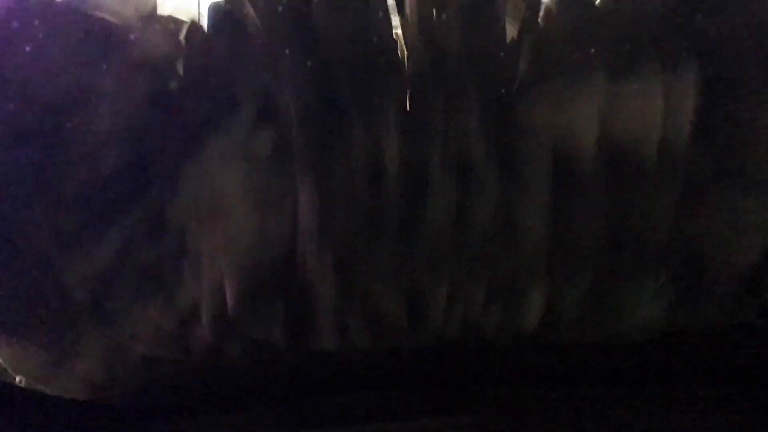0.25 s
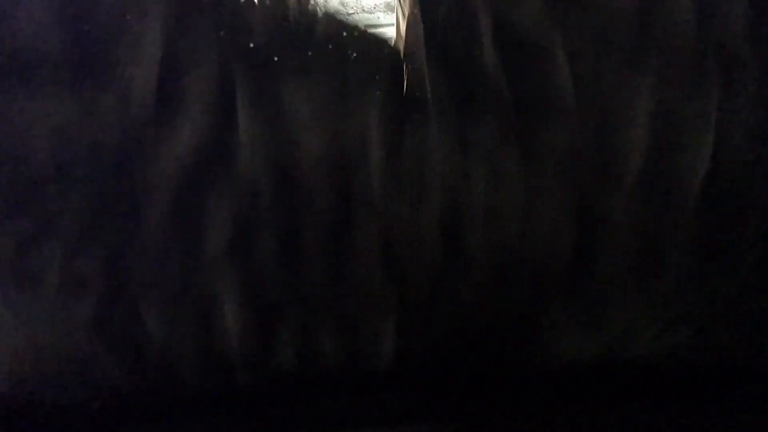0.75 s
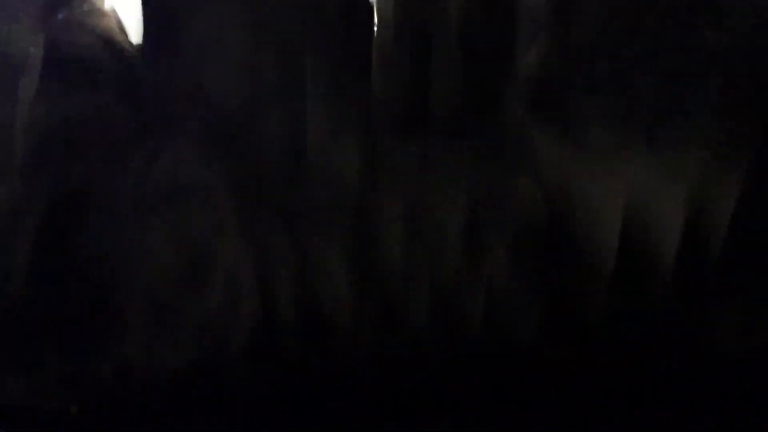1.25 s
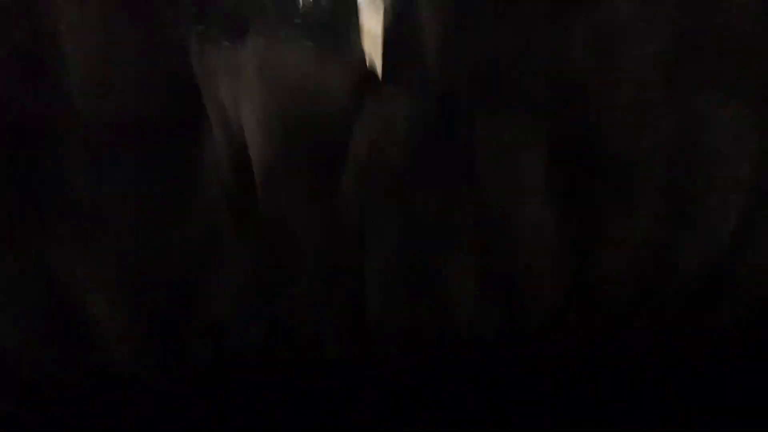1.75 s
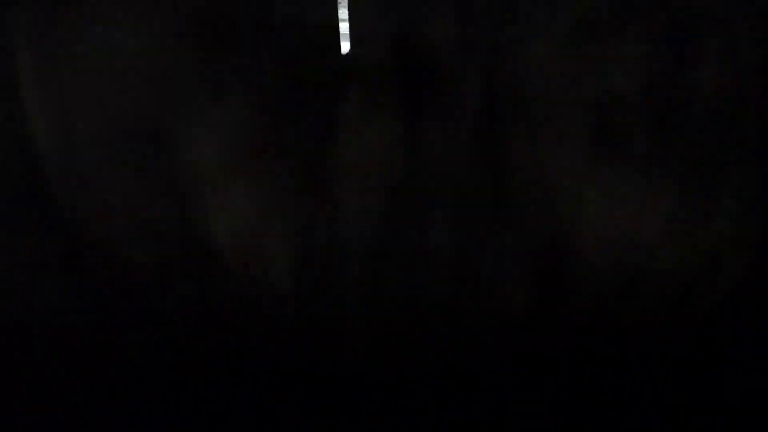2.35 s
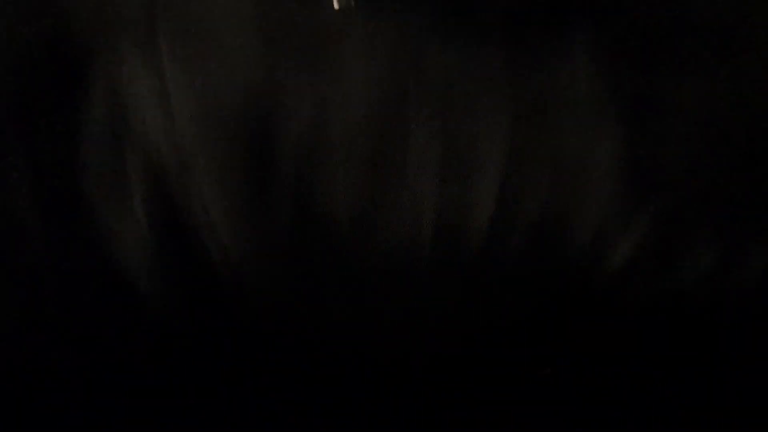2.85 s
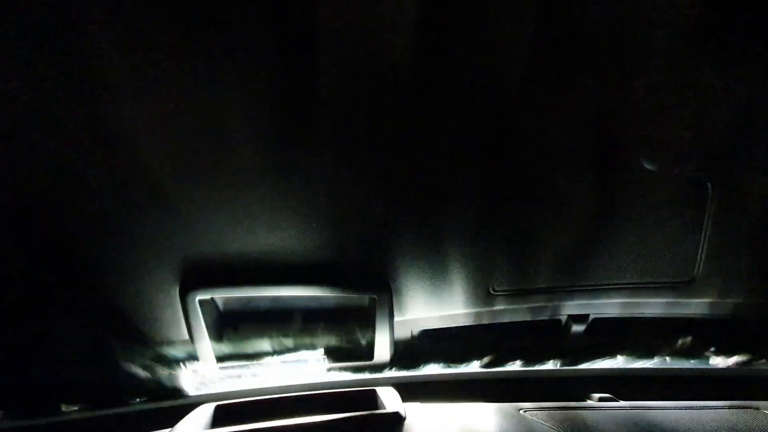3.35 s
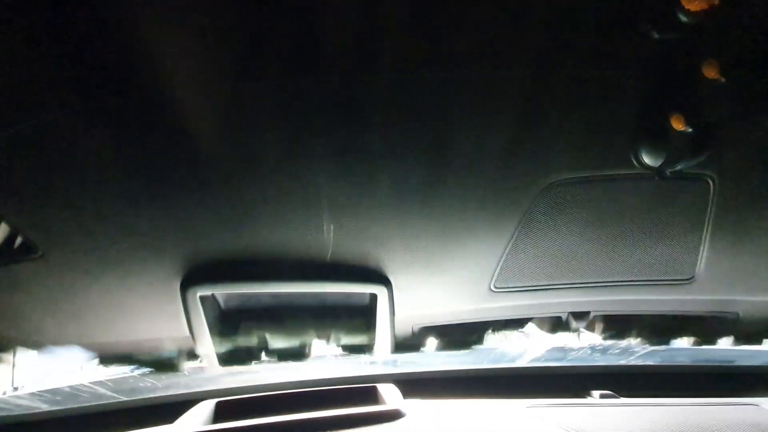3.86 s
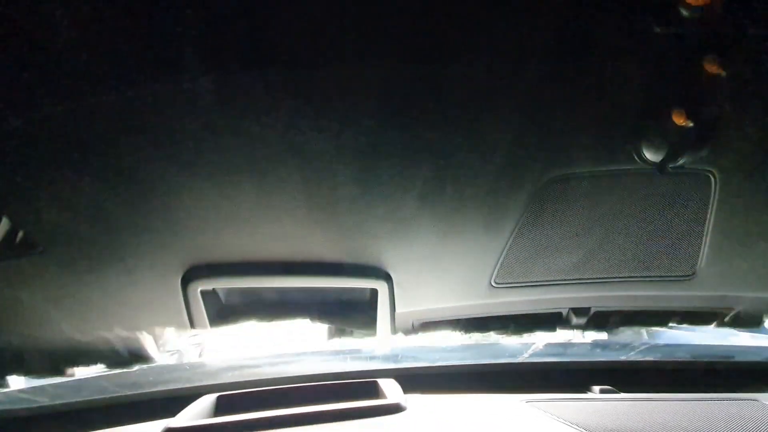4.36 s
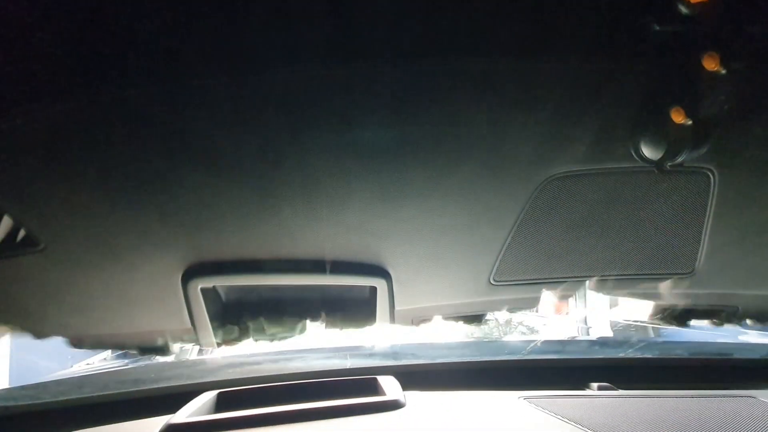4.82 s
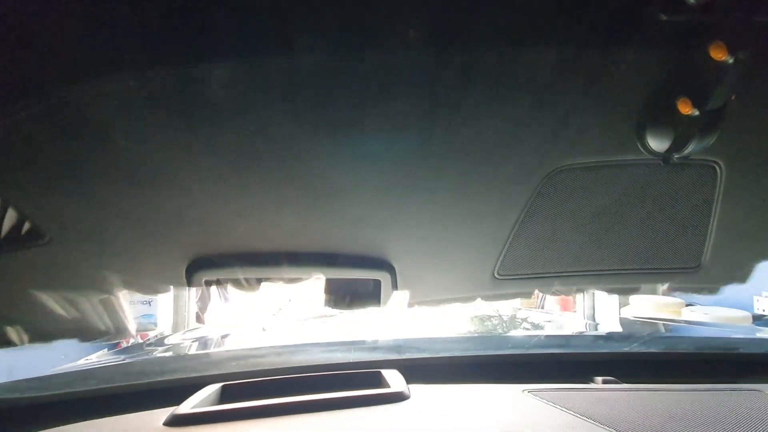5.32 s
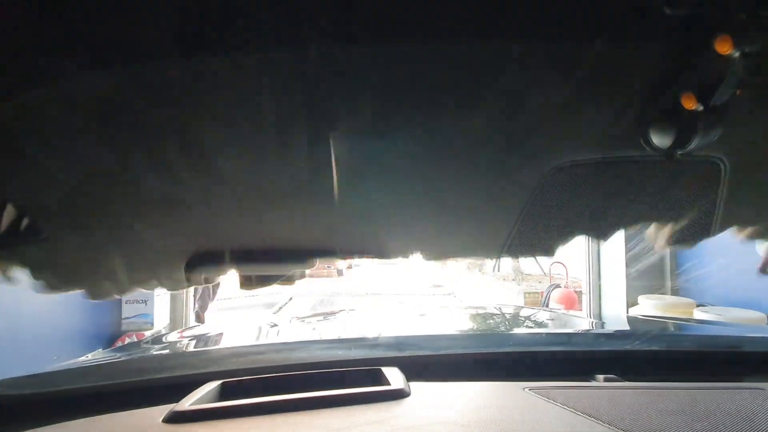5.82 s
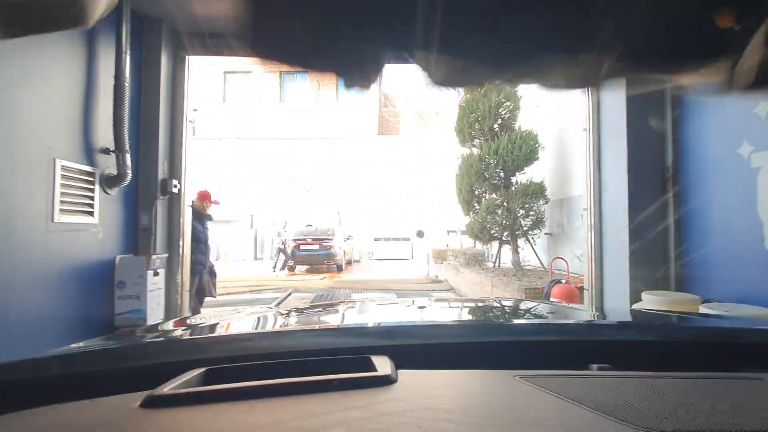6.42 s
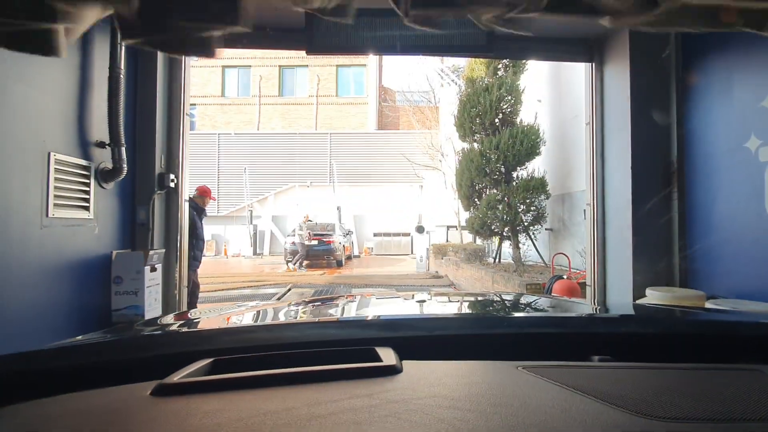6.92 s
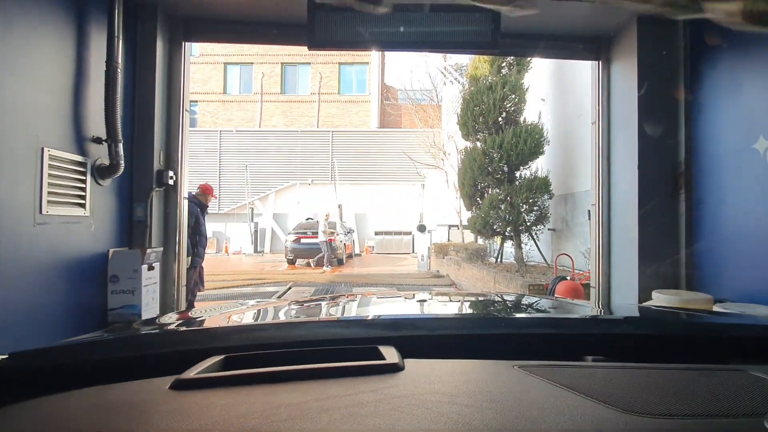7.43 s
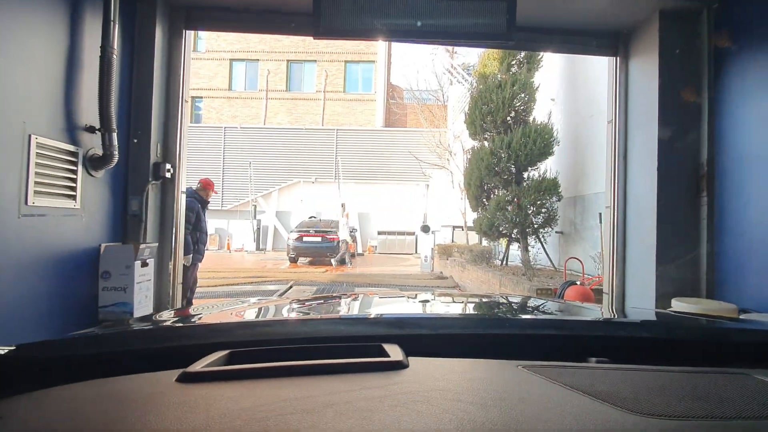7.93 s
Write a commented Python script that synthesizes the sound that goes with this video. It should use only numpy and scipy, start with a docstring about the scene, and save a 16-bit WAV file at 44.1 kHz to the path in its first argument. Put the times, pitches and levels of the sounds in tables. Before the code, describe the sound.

Inside a closed car in a wash bay, stereo microphones on the dashboard catch a dense, low, buffeting dryer roar. It starts with a brief louder surge, then slowly eases as the blower moves away over the roof, leaving a steady boomy rumble. Weak fan tones and a thin high whine waver within it; near the end come faint close rustles, a tiny creak and small dry ticks.

```python
"""A buffeting roar comes first: a dryer's air jet on a closed car in a wash bay, heard by stereo microphones
on the dashboard. Jet and bay are coloured noise (turbulence) filtered by cabin resonances; the jet fades as
the gantry moves away over the roof while the bay keeps roaring. Noise bands swell and fade within the roar,
some sliding in pitch; narrow noise bands and a wavering sine are fan and motor tones. Close by, mostly late
on, grainy noise and slip pulses rustle, and damped modes with noise bursts tick."""
import sys
import numpy as np
from scipy import signal
from scipy.fft import rfft, irfft, next_fast_len
from scipy.io import wavfile
from scipy.ndimage import uniform_filter1d

SR = 44100
rng = np.random.default_rng(int(sys.argv[2]) if len(sys.argv) > 2 else 0)


def master(y):
    """Save y as 16-bit WAV."""
    cut = np.clip(np.atleast_2d(y).T, -1, 1)
    pcm = np.round(cut * 32767)  # scale
    wavfile.write(sys.argv[1], SR, pcm.astype(np.int16))


N = 360738  # length in samples
FFT_N = next_fast_len(N)


def undb(db):
    """Level to amplitude: 20 dB is a factor of ten."""
    return 10 ** (np.asarray(db) / 20)


def seconds():
    """Sampling principle: sample n lies at n / SR seconds."""
    return np.arange(N) / SR


def bins():
    """Discrete Fourier analysis: spectrum lines one bin apart, counted from the first bin above zero."""
    return np.arange(1, FFT_N // 2 + 2) * SR / FFT_N


def colour(points):
    """Spectral envelope: dB at each line, interpolated over log frequency."""
    hz, db = np.transpose(points)
    return np.interp(np.log(bins()), np.log(np.maximum(hz, 1)), db)


def shaped(x, db):
    """Linear filtering: multiply the spectrum of x by a gain in dB at each line."""
    spectrum = rfft(x, FFT_N) * undb(db)
    return irfft(spectrum, FFT_N)[..., :N]


def noise(db):
    """Coloured random noise: filtered white noise, brought to rms 1."""
    x = shaped(rng.standard_normal(N), db)
    return x / np.std(x)


def walk(rate):
    """Slow random modulation: levels held 1 / rate s and smoothed twice; spread near 1."""
    k = int(SR / rate)
    steps = np.repeat(rng.standard_normal(N // k + 1), k)
    smooth = uniform_filter1d(uniform_filter1d(steps, k), k)
    return 1.3 * smooth[:N]


def peak(hz, width):
    """Resonance: Lorentzian power response, 1 at its centre."""
    return 1 / (1 + (2 * (bins() - hz) / width) ** 2)


def sides(x, pan_db):
    """Interchannel level difference: left is pan_db above right."""
    return x * undb(np.array([[pan_db], [-pan_db]]) / 2)


def bell(middle, half):
    """Gaussian envelope: 1 at the middle, 1/e at half s to either side."""
    return np.exp(-((seconds() - middle) / half) ** 2)


def stroke(start, hold, edge):
    """Held envelope: 1 while held, with Gaussian edges before and after."""
    t = seconds()
    outside = np.maximum(np.maximum(start - t, t - start - hold), 0)
    return np.exp(-(outside / edge) ** 2)


WAVER_WIDTHS, WAVER_PER_S = .28, 6  # centre wanders by a share of the width
FLICKER_DB, FLICKER_PER_S = 2.2, 9


def band(hz, width, glide=0, middle=0):
    """Narrow-band noise: its analytic signal is shifted in frequency, its level flickers; rms near 1."""
    shift_hz = glide * (seconds() - middle) + WAVER_WIDTHS * width * walk(WAVER_PER_S)
    ring = signal.hilbert(noise(20 * np.log10(peak(hz, width))), FFT_N)[:N]
    shifted = (ring * np.exp(2j * np.pi * np.cumsum(shift_hz) / SR)).real
    return shifted * undb(FLICKER_DB * walk(FLICKER_PER_S))


# cabin resonances, negative lifts being dips:
# f/Hz, width/Hz, lift of the shared part/dB, lift of the opposite part/dB
CABIN_MODES = [(58.4, 26, 4.5, 3.5), (121.3, 20, 7.5, 1.5), (176, 39, 2, -1), (317, 62, 4.5, 1.5),
               (413, 34, 1.5, 0), (525, 51, -0.5, 2.5), (753, 100, 5, 0.5), (800, 45, 0.5, 5),
               (1007, 52, 5, 2), (1340, 360, 3.5, 1.5), (1400, 60, -2, 3.5), (1790, 52, 3.5, 0.5),
               (1920, 61, 4, 2.5), (2483, 220, 4.5, 6), (91, 13, -1, -0.5), (144, 14, -1, 0),
               (262.5, 20, -3.5, -2), (289.5, 20, 3, -0.5), (640, 43, -1, 0.5), (2790, 140, 2, 0.5),
               (1750, 54, -3, 1), (2180, 130, -2, -4), (2560, 81, 0.5, -5), (4260, 1500, 3, 1.5),
               (7040, 1800, 4.5, -5.5)]


def cabin():
    """Room modes: even and odd modes lift or lower the spectrum around each resonance."""
    return sum(np.array([[even], [odd]]) * peak(hz, width) for hz, width, even, odd in CABIN_MODES)


def roar(mid, side, side_db, gust_db, modes):
    """Turbulence in an enclosure: even modes reach both microphones alike, odd ones with opposite sign."""
    alike = noise(colour(mid) + modes[0]) * undb(gust_db * walk(9))
    opposite = noise(colour(side) + modes[1]) * undb(side_db + gust_db * walk(8.8))
    return np.array([alike + opposite, alike - opposite])


# noise spectrum of the jet, shared by both microphones: f/Hz, relative density/dB
JET_SHARED = [(40, -17), (90, -8), (200, -1.5), (270, -10), (500, -17), (650, -24), (1100, -34),
              (2200, -40), (3200, -47), (5000, -58.5), (7500, -70.5), (8500, -74.5), (16000, -94)]
# noise spectrum of the jet, opposite in sign at the two microphones: f/Hz, relative density/dB
JET_OPPOSITE = [(40, -23), (100, -9.5), (200, -8), (270, 0), (500, -8.5), (1000, -15.5), (2000, -25.5),
                (3200, -36.5), (5000, -46.5), (7500, -51), (8500, -65), (16000, -74.5)]
JET_DB, JET_FAR_DB, JET_OPPOSITE_DB = -16.5, -23.5, -8  # overhead; far; opposite part re shared part
JET_LEAVES_S, JET_FADE_DB_PER_S = 1.34, 1.5
JET_GUST_DB = 0.73


def jet(modes):
    """Jet noise and distance: gusting turbulence, steady overhead, then fading until it is far."""
    fade_db = JET_FADE_DB_PER_S * (seconds() - JET_LEAVES_S)
    jet_db = np.clip(JET_DB - fade_db, JET_FAR_DB, JET_DB)
    return undb(jet_db) * roar(JET_SHARED, JET_OPPOSITE, JET_OPPOSITE_DB, JET_GUST_DB, modes)


# noise spectrum of the bay, shared by both microphones: f/Hz, relative density/dB
BAY_SHARED = [(15, -27), (25, -5.5), (45, 2.5), (90, -4.5), (200, -12.5), (270, -17), (500, -32),
              (650, -36), (1100, -40.5), (2200, -42.5), (3200, -60.5), (5000, -61.5), (7500, -68.5),
              (8500, -79.5)]
# noise spectrum of the bay, opposite in sign at the two microphones: f/Hz, relative density/dB
BAY_OPPOSITE = [(15, -29), (30, -8.5), (60, -1.5), (100, -10), (200, -2.5), (270, -3), (500, -10),
                (1000, -21), (2000, -24), (3200, -36.5), (5000, -45.5), (7500, -43), (8500, -62)]
BAY_DB, BAY_OPPOSITE_DB, BAY_GUST_DB = -21.5, -12.5, 0.19
BAY_EARLY_DB, BAY_SETTLE_S = 7.5, 0.16  # louder at first, by this much


def bay(modes):
    """Background turbulence: a nearly steady roar whose level settles exponentially."""
    bay_db = BAY_DB + BAY_EARLY_DB * np.exp(-seconds() / BAY_SETTLE_S)
    return undb(bay_db) * roar(BAY_SHARED, BAY_OPPOSITE, BAY_OPPOSITE_DB, BAY_GUST_DB, modes)


# stereo balance of the roar: f/Hz, left minus right/dB
ROAR_LEAN = [(60, -0.5), (220, 0.5), (320, -5), (530, 2), (820, 0.6), (1260, -0.1), (1950, -4), (2500, 0.5),
             (3200, -0.7), (4500, -4.5), (7000, -4), (8500, -2)]


def lean(air):
    """Frequency-dependent level difference: half the lean is added left and taken away right."""
    return shaped(air, colour(ROAR_LEAN) * np.array([[.5], [-.5]]))


# noise bands that swell and fade within the roar, some sliding in pitch:
# f/Hz, width/Hz, glide/(Hz/s), middle t/s, half length/s, level before flicker/dB, left minus right/dB
SWELLING_BANDS = [(2517, 100, -30.5, .2, 1.1, -52, 1.5), (2460, 110, -20, 2.4, 1.1, -58, 2.5),
                  (2530, 96, -26, 3.85, 0.26, -53, -1), (2400, 130, -39.5, 4.6, .7, -60, 2),
                  (480, 70, -10, 1.2, 1.8, -38.5, 3.5), (296, 50, 0, 1.1, 0.8, -31, -1.5),
                  (315.5, 46, 0.5, 2.915, 0.46, -30, -5), (193, 45, -0.5, 4.34, 0.45, -30.5, -2.5),
                  (980, 84, 0, 5.2, 0.72, -58.5, -0.5), (744, 60, -0.5, 5.3, 0.85, -54, -3.5),
                  (1960, 55, 1.5, 3, 2, -57, -2.5), (1820, 130, -10, 5.6, 0.95, -57, -1),
                  (1750, 130, 29.5, 6.95, 0.54, -53, -8.5), (1895, 110, 60, 7.8, 0.8, -53, -1),
                  (1467, 45, 0.5, 7.7, 0.5, -54, -2.5), (1143, 60, 0, 6.9, 0.54, -55.5, -3.5),
                  (724, 70.8, -0.5, 7.5, 0.65, -46, -3), (195, 65, 1, 8.2, 0.52, -32, -1),
                  (342, 98, 0.5, 7.63, 0.48, -37, -1), (58, 26.8, 0.5, 8, 0.53, -28.5, 1)]


def swells():
    """Amplitude-modulated narrow-band noise: bands rise and fall along bell curves, some sliding in pitch."""
    out = 0
    for hz, width, glide, middle, half, db, pan in SWELLING_BANDS:
        swell = bell(middle, half) * band(hz, width, glide, middle)
        out = out + sides(undb(db) * swell, pan)
    return out


# fan and motor tones: f/Hz, width/Hz, level before flicker/dB, left minus right/dB
FAN_TONES = [(692.5, 16, -49.5, -4.5), (1794, 32, -65, -8)]
# course of the whine: t/s, level before flutter/dB
WHINE_COURSE = [(0, -76), (3.75, -75), (4.02, -65.5), (4.3, -66), (4.65, -63), (4.95, -66), (5.25, -69),
                (5.45, -74), (5.9, -76), (8.2, -78)]
WHINE_HZ = 3723


def fans():
    """Rotating-machine tones: narrow noise bands waver; a steadier frequency-modulated whine swells for a while."""
    tones = sum(sides(undb(db) * band(hz, width), pan) for hz, width, db, pan in FAN_TONES)
    whine_db = np.interp(seconds(), *np.transpose(WHINE_COURSE))
    phase = 2 * np.pi * np.cumsum(WHINE_HZ + 2 * walk(20)) / SR
    flutter_db = 2.3 * walk(60) - .2
    whine = np.sqrt(2) * np.sin(phase) * undb(whine_db + flutter_db)  # sqrt(2): unit-rms sine
    return tones + sides(whine, -10.0)


# friction noise spectrum: f/Hz, relative density/dB
RUB_COLOUR = [(2000, -25), (4300, 0), (7000, -1), (8500, -6), (11000, -1), (13500, -3), (15500, -2)]
# strokes of rustling: start t/s, hold/s, rise and fall/s, relative level/dB
RUB_STROKES = [(1.4, .8, .25, -80), (5.74, .04, .06, -72), (6.1, .12, .17, -72.5), (6.57, .035, .015, -71),
               (6.81, .095, .018, -67), (6.955, .075, .018, -68.5)]
RUSTLE_BED_DB, RUSTLE_FROM_S = -74.5, 6.2  # relative level of a faint rustle between the late strokes
CREAK_S, CREAK_HOLD_S = 6.82, .045  # inside the loudest stroke
CREAK_PER_S, CREAK_DB = 520, -67


def creak():
    """Stick-slip: nearly periodic slip pulses make a brief buzz."""
    slip_count = np.floor(np.cumsum(CREAK_PER_S * (1 + .004 * walk(100))) / SR)
    buzz = shaped(np.diff(slip_count, prepend=0), colour(RUB_COLOUR))
    buzz = buzz / np.std(buzz)
    return sides(undb(CREAK_DB) * stroke(CREAK_S, CREAK_HOLD_S, .01) * buzz, -1.5)


def rustle():
    """Friction noise: soft grains near the microphones, partly shared, with bands that come in patches."""
    rub = sum(undb(db) * stroke(start, hold, edge) for start, hold, edge, db in RUB_STROKES)
    rub = rub + undb(RUSTLE_BED_DB) * stroke(RUSTLE_FROM_S, N / SR, .1)
    spectrum_db = colour(RUB_COLOUR)
    out = 0
    for hz in (4500, 7000, 10500, 14000):
        band_db = spectrum_db + 20 * np.log10(peak(hz, hz / 2))
        shared, left, right = (noise(band_db) for _ in range(3))
        centre_db = spectrum_db[int(hz * FFT_N / SR)]
        patch = undb(centre_db - 4 + 1.2 * walk(30))
        out = out + patch * (sides(shared, -1.5) + 0.7 * np.array([left, right]))
    grain_db = 2.2 * walk(450)
    return rub * undb(grain_db) * out + creak()


# ticks: t/s, peak level before panning/dB, left minus right/dB, crack over ring/dB
TICK_EVENTS = [(3.4885, -52, -5, 8), (5.3637, -47, -2, 8), (5.671, -57, -3, 6), (6.575, -50, -3, 3),
               (6.8994, -53, 0, 3), (7.1866, -53, -3, 8), (7.2578, -53, -7, 8), (7.3565, -30.5, -14, -10)]
# damped modes of a tick: f/Hz, relative level/dB, 60 dB decay time/s
DAMPED_MODES = [(2500, -14, .005), (3900, -9, .004), (5600, -3, .0035), (6700, -1, .0035), (9700, -6, .003),
                (11200, -6, .003), (12500, -10, .003), (14700, -13, .003)]
# crack noise spectrum: f/Hz, relative density/dB
CRACK_SPECTRUM = [(1500, -29.5), (4000, -3), (8000, 3), (12000, -1), (16000, -4)]
CRACK_T60_S, CONTACT_S = 0.0029, .0014
SNAP = 8  # height of the crack's sharp edge against its noise's rms


def ticks():
    """Impact excitation: damped modes and a broad crack, with mode phases drawn anew for each tick."""
    out, t = np.zeros((2, N)), np.arange(800) / SR
    turns = rng.random((len(TICK_EVENTS), len(DAMPED_MODES)))
    cracks = noise(colour(CRACK_SPECTRUM))
    snap = np.roll(irfft(undb(colour(CRACK_SPECTRUM))), 66)[:len(t)]  # sharp edge as the contact closes
    snap = SNAP * snap / snap.max()
    crack_decay = np.exp(-np.log(1000) * t / CRACK_T60_S)
    contact = np.minimum(t / CONTACT_S, 1) ** 6  # builds up over about a millisecond
    for (start, db, pan, crack_db), phases in zip(TICK_EVENTS, turns):
        i = int(start * SR)
        hit = 0
        for (hz, mode_db, t60), turn in zip(DAMPED_MODES, phases):
            decay = np.exp(-np.log(1000) * t / t60)
            hit = hit + undb(mode_db) * np.sin(2 * np.pi * (hz * t + turn)) * decay
        hit = hit + undb(crack_db) * (cracks[i:i + len(t)] + snap) * crack_decay
        hit = hit * contact
        # peak taken as that of a sine with the greatest short-term power
        height = np.sqrt(2 * np.max(uniform_filter1d(hit ** 2, size=40)))
        out[:, i:i + len(t)] += sides(undb(db) * hit / height, pan)
    return out


def scene():
    """Superposition: jet and bay share the cabin modes and the lean; the other sounds lie on top."""
    modes = cabin()
    air = lean(jet(modes) + bay(modes))
    return air + swells() + fans() + rustle() + ticks()


HISS_DB, TOP_HZ = -69.5, 15780


def record(dry):
    """Self-noise and band limiting: the microphones hiss faintly and the recorder cuts the top."""
    hiss = undb(HISS_DB) * rng.standard_normal(dry.shape)
    low_pass = signal.ellip(10, .2, 80, TOP_HZ, fs=SR, output="sos")  # ripple .2 dB, stopband -80 dB
    return signal.sosfilt(low_pass, dry + hiss)


dry = scene()
out = record(dry)
master(out)
```